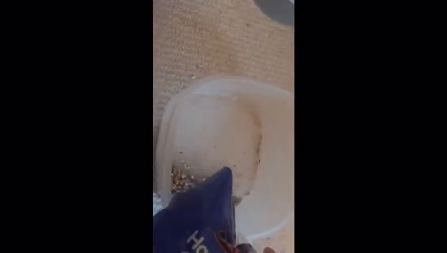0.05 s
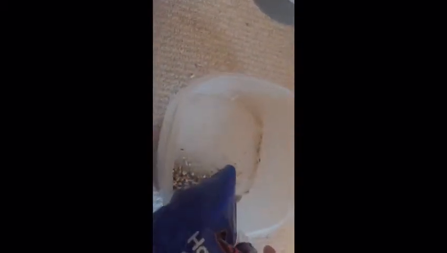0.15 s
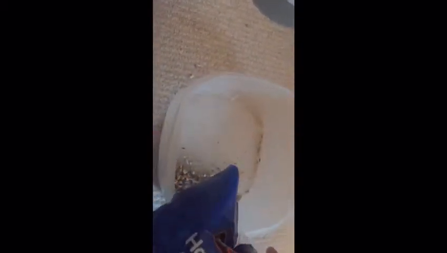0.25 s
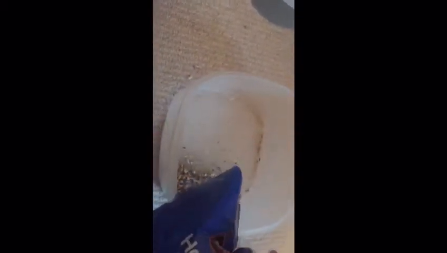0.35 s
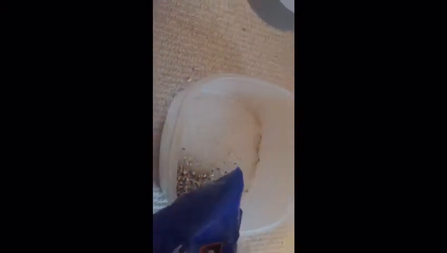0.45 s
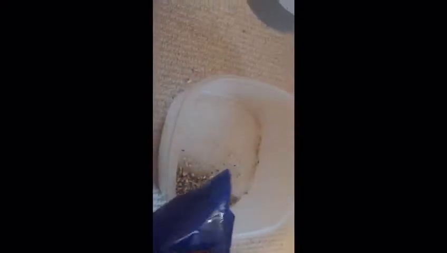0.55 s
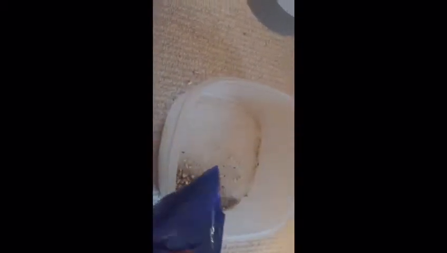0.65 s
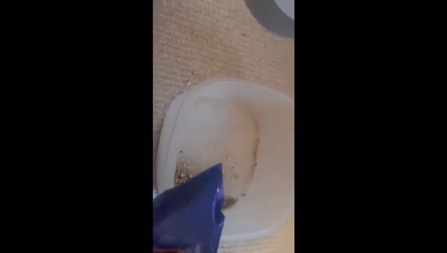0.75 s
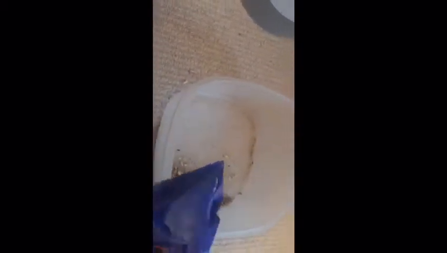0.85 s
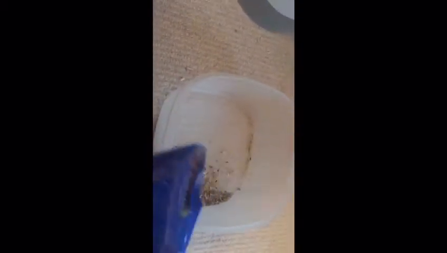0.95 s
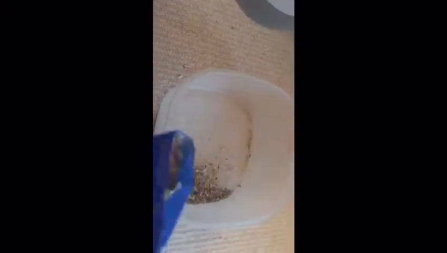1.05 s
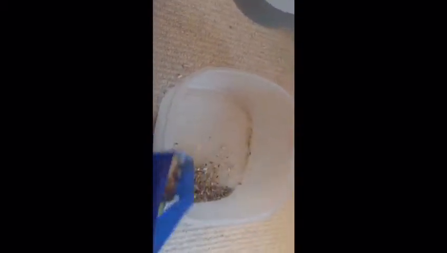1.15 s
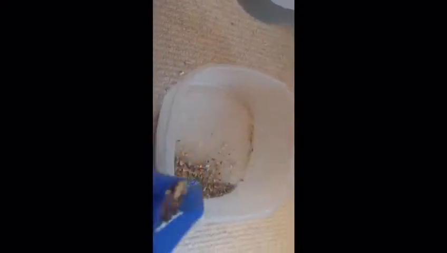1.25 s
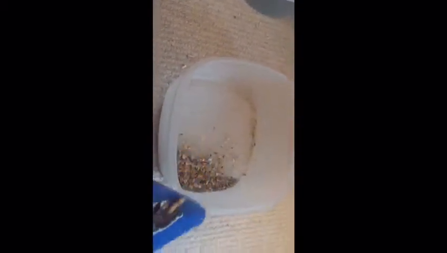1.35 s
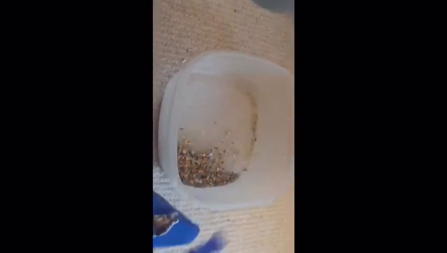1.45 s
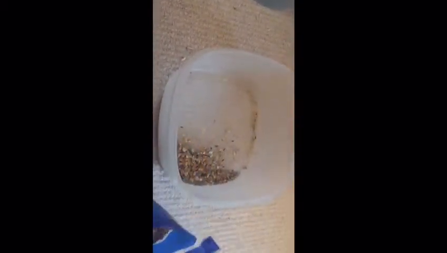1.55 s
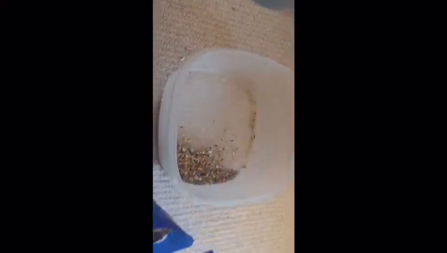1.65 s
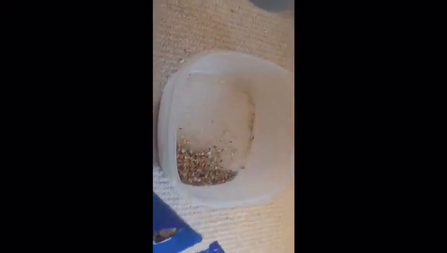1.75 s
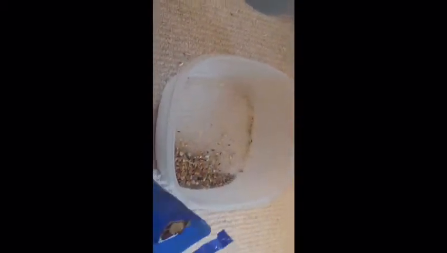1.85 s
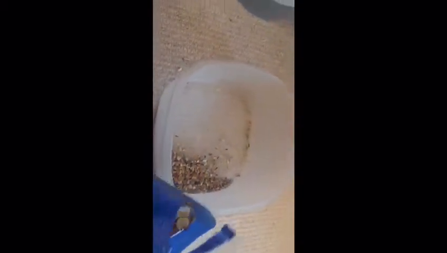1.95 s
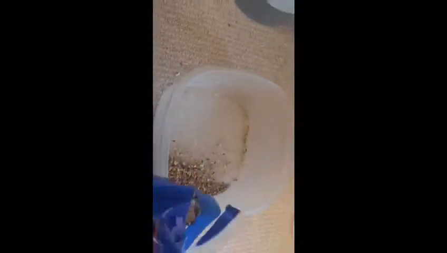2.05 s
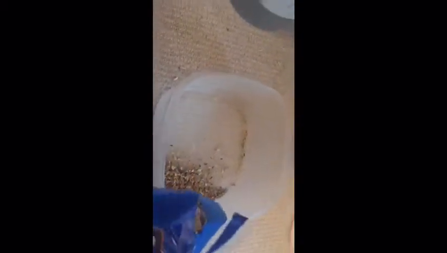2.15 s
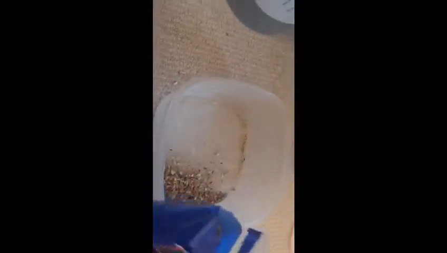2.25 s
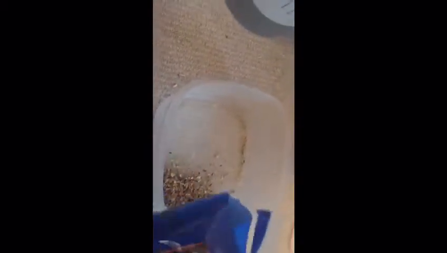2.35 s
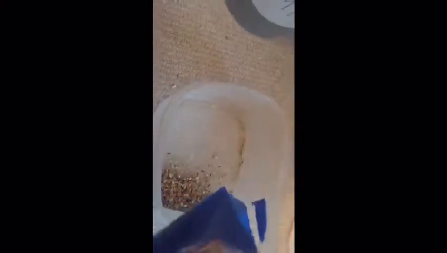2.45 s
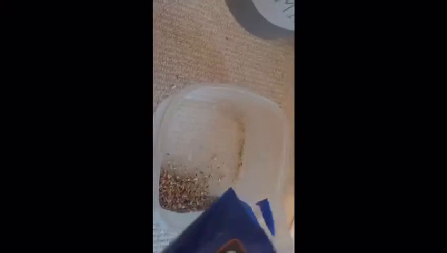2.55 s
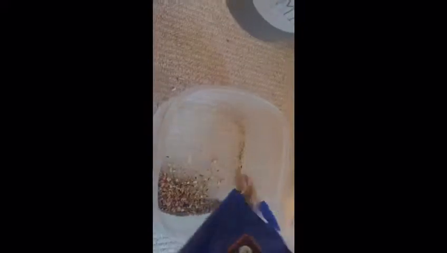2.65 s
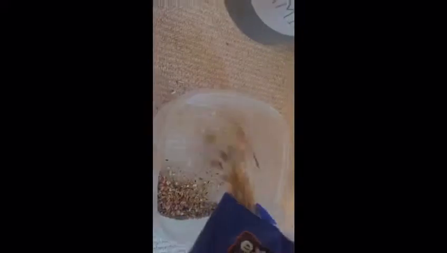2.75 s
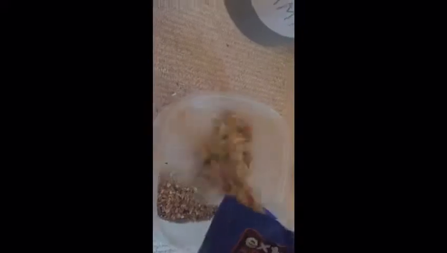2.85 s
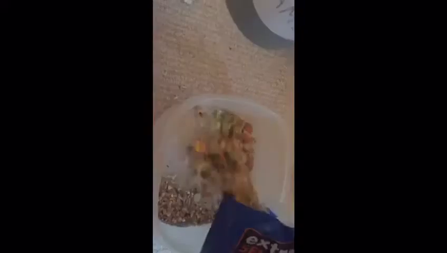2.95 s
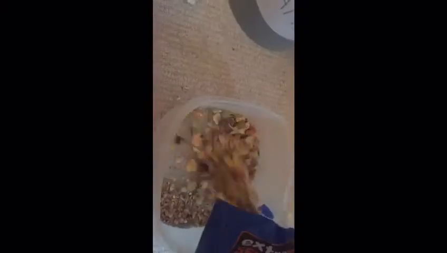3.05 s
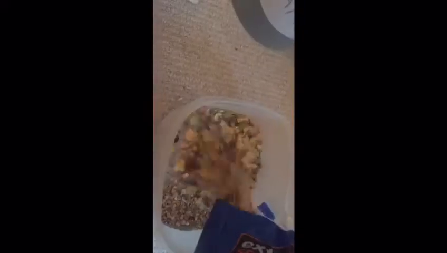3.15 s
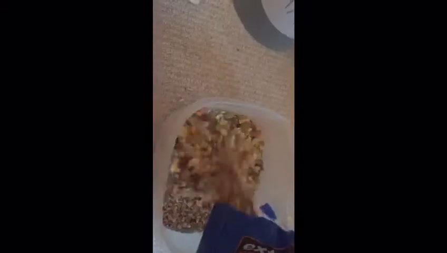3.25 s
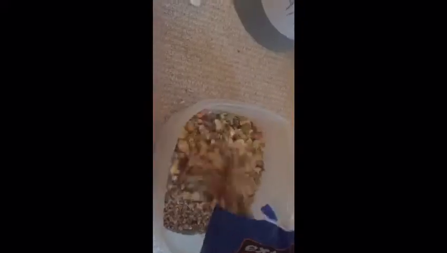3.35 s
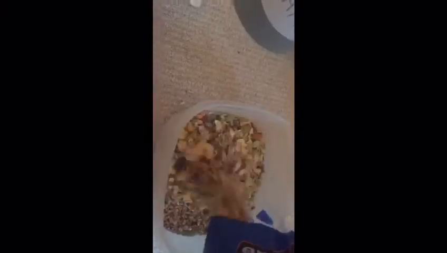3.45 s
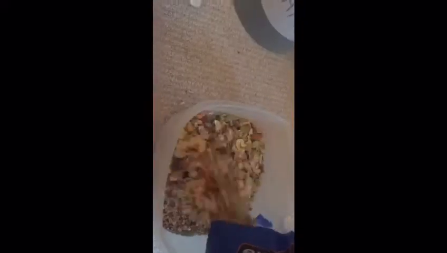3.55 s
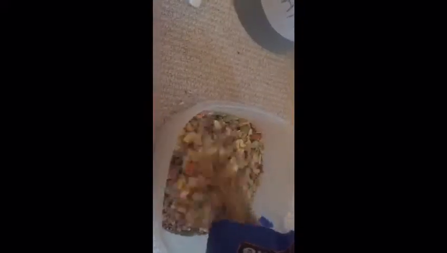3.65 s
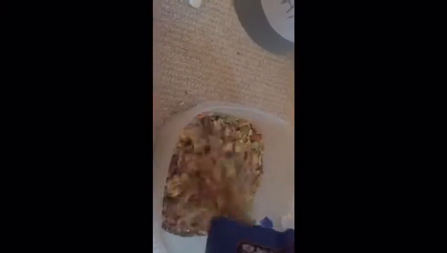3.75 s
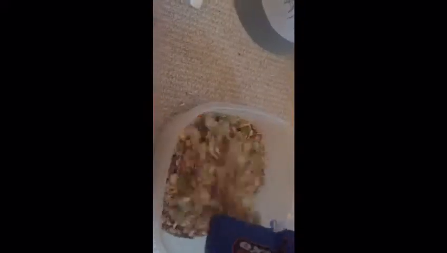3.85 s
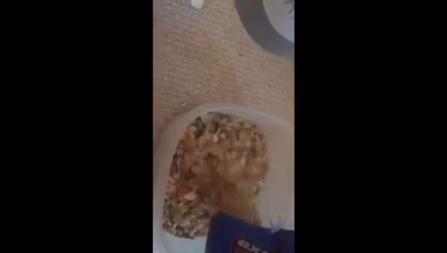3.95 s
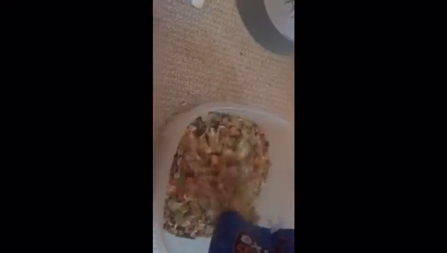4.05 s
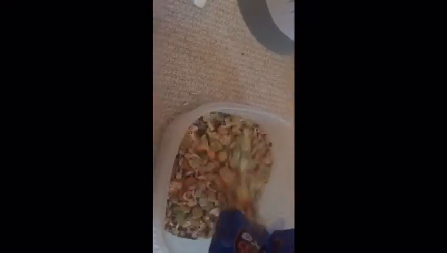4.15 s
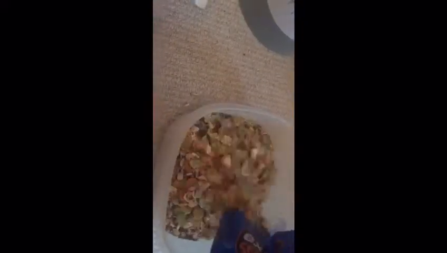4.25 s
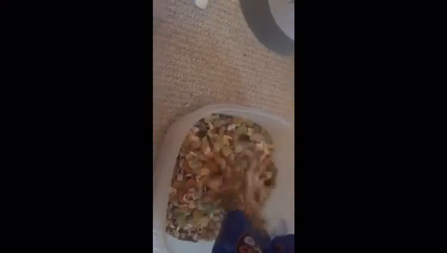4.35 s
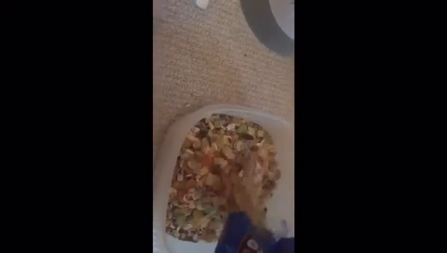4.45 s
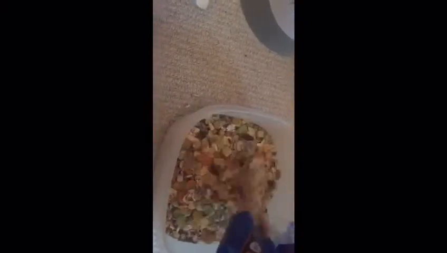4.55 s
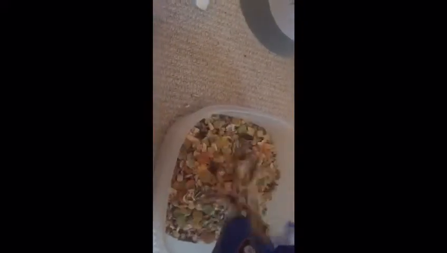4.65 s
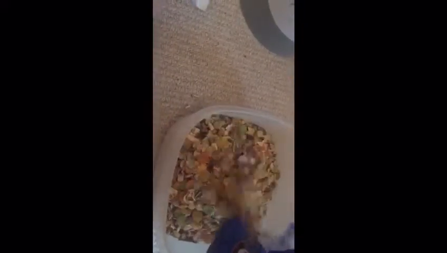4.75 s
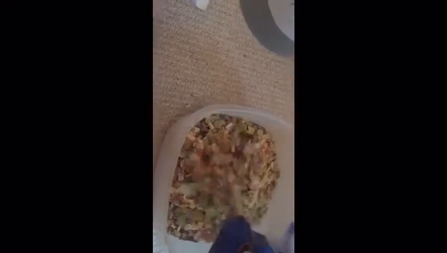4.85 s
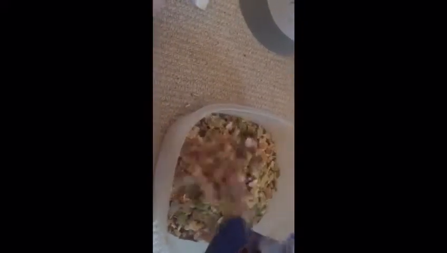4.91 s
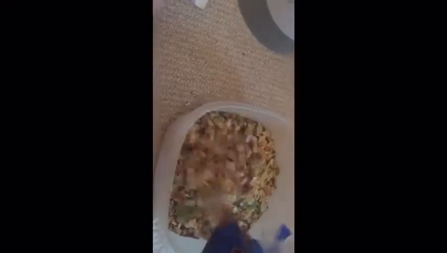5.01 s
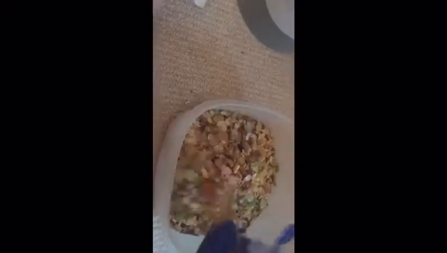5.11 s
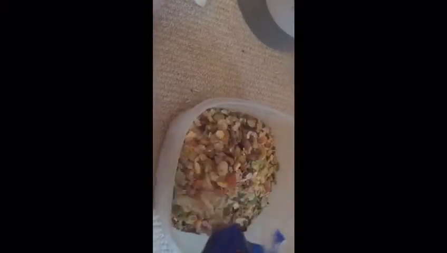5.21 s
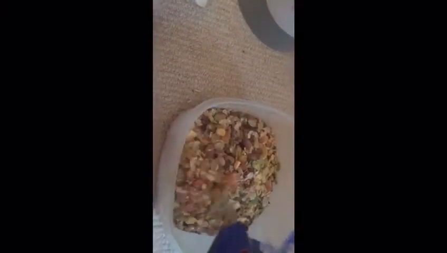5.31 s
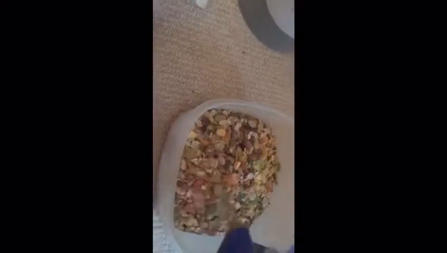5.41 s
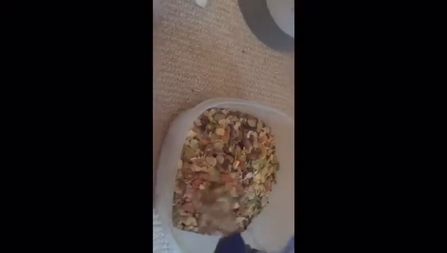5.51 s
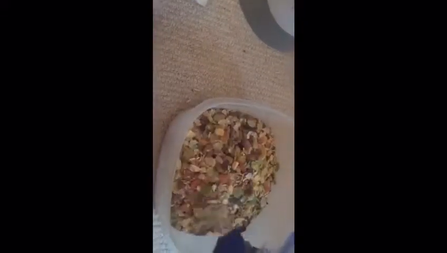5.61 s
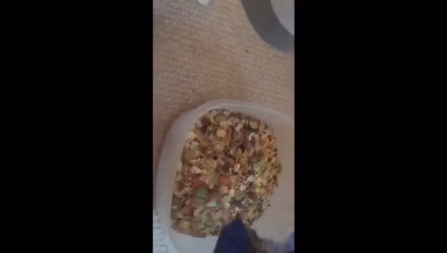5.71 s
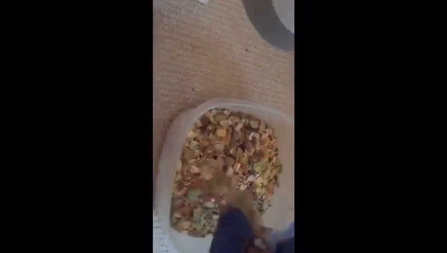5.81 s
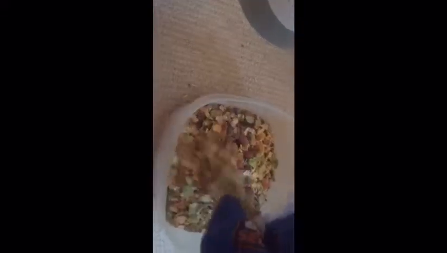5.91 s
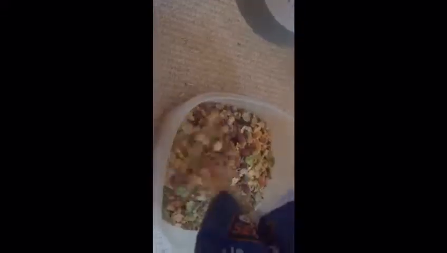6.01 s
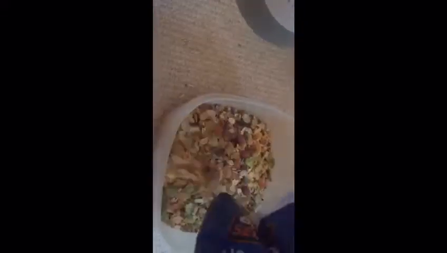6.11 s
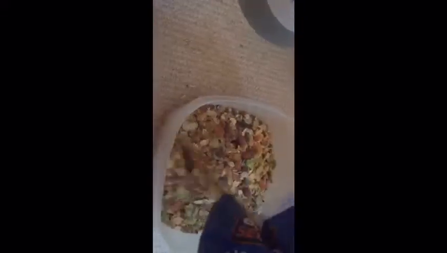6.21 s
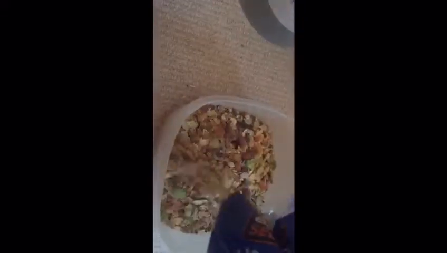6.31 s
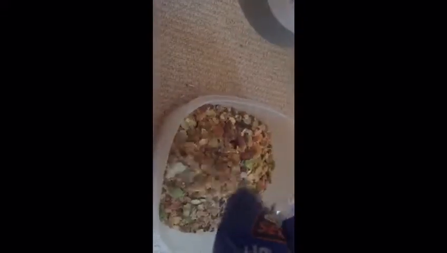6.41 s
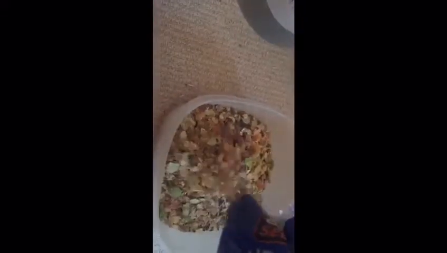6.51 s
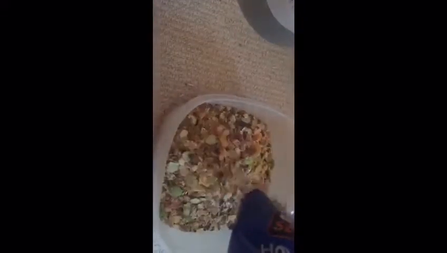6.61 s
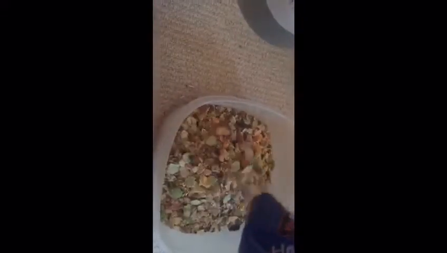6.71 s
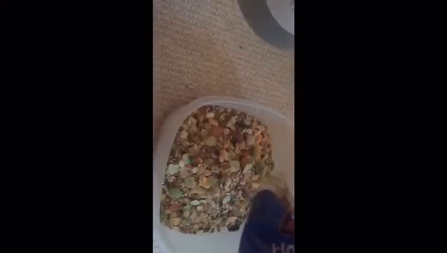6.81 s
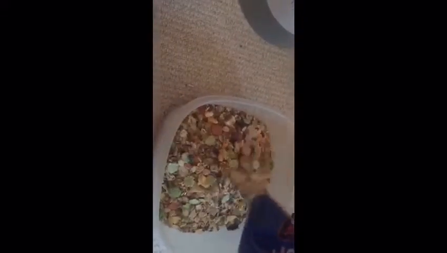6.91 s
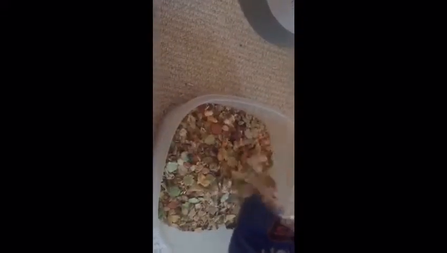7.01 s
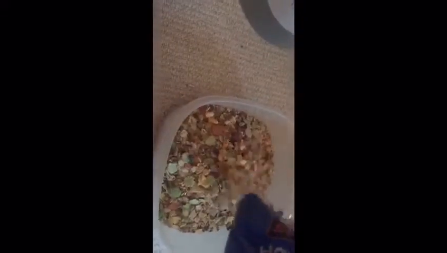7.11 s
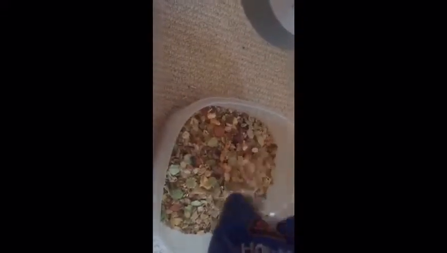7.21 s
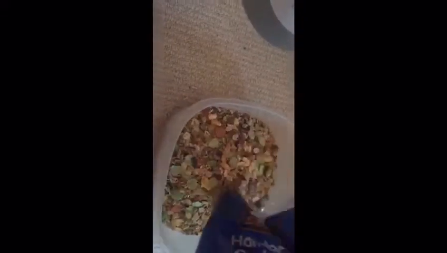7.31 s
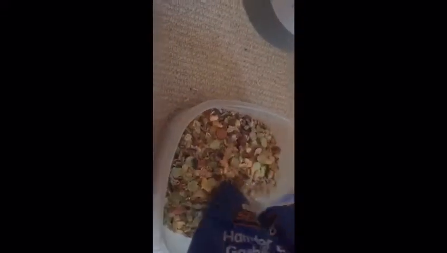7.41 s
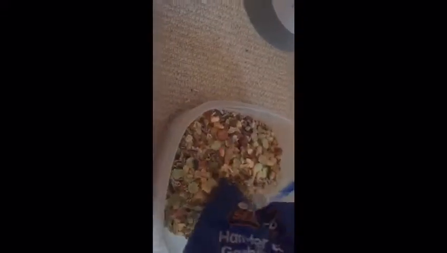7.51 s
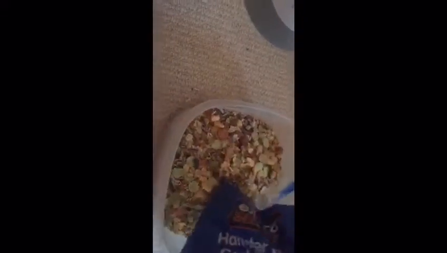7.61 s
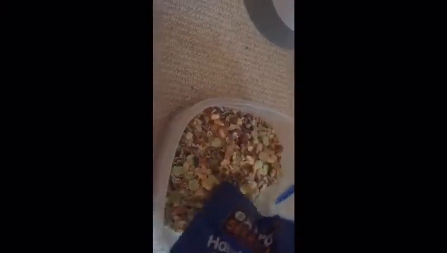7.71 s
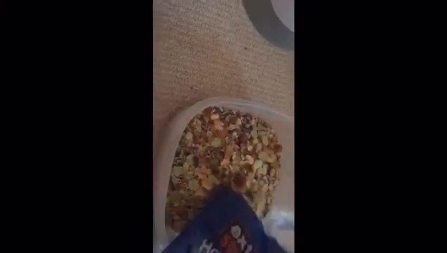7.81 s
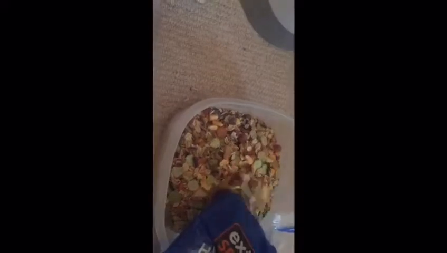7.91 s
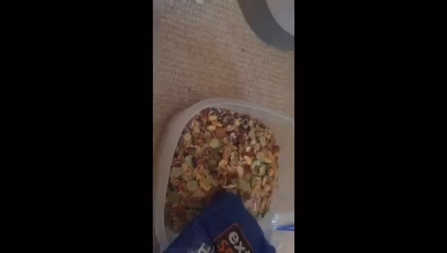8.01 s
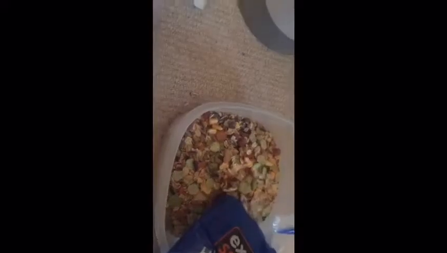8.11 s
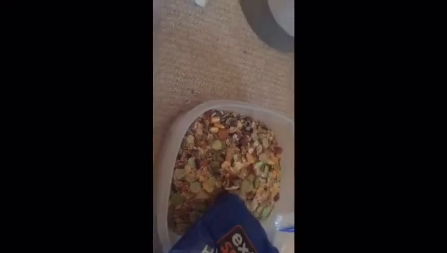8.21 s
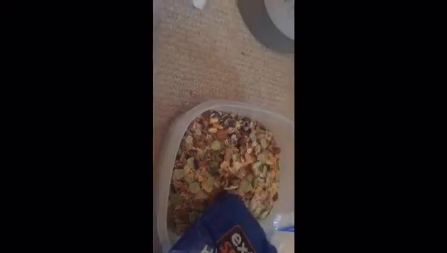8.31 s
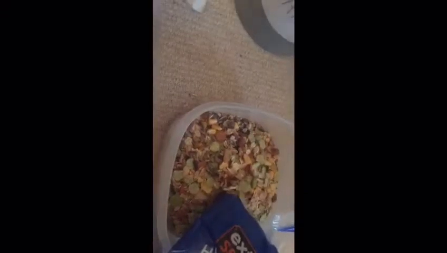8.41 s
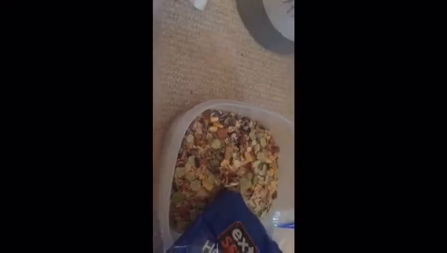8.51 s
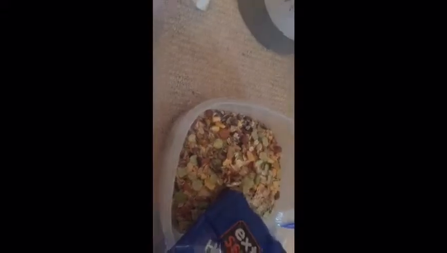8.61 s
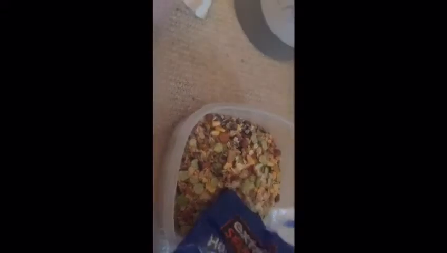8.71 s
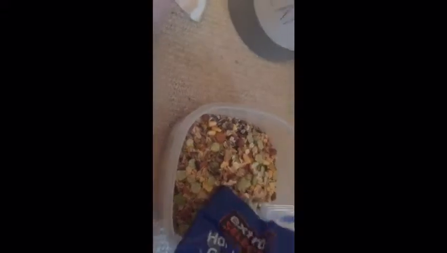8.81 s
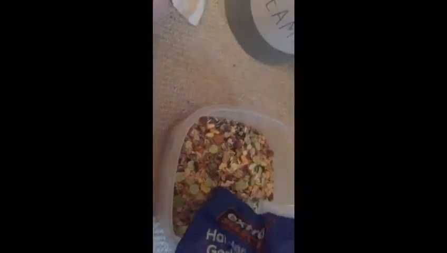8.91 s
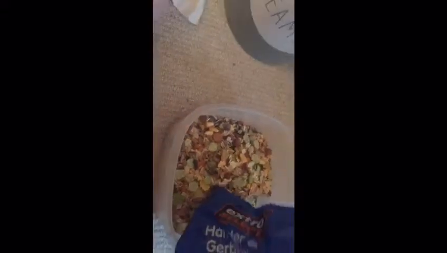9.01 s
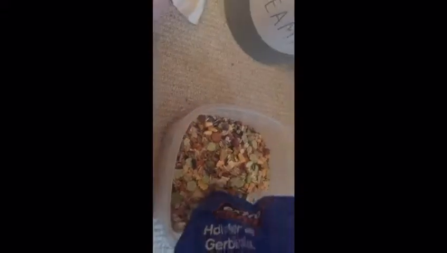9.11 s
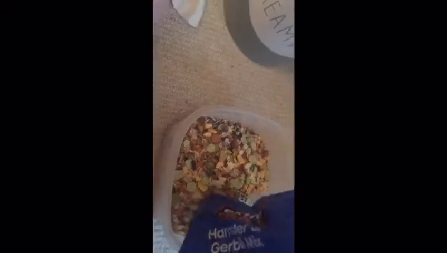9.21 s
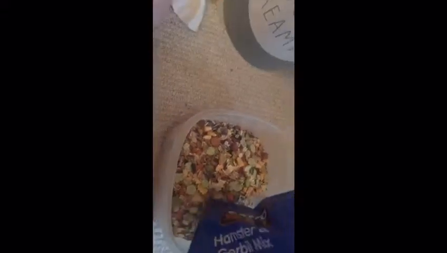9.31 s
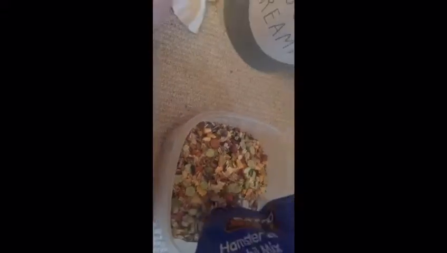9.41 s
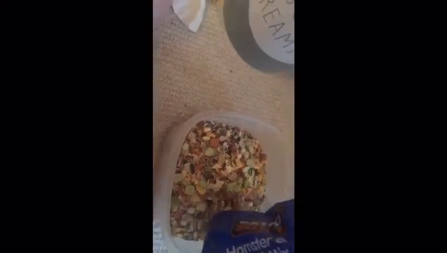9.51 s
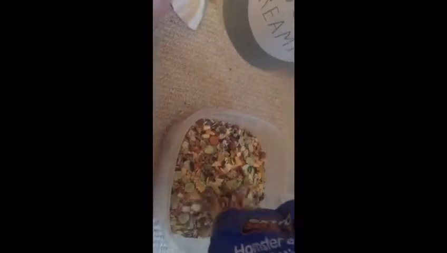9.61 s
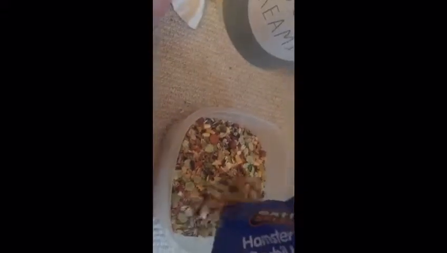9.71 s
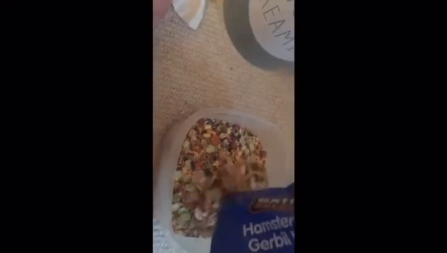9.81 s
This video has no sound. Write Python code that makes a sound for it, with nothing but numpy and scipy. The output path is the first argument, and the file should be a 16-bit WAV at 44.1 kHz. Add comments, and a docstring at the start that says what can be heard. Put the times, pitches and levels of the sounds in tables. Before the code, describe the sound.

A stiff plastic bag crinkles, then dry seed and pellet mix bursts loudly into a plastic tub, softens to patter, pauses and resumes.

```python
"""Dry seed and flake mix is poured from a stiff plastic bag into a plastic tub on a carpeted floor, close by.
The first pellets drum on the bare tub; the growing heap muffles it and the stream becomes a fine patter.
The bag crinkles as it is opened and tipped, then is gripped anew and the pouring starts again.
Stream and crinkle are showers of tiny random contacts; clacks, ticks, knocks and thumps are short bursts
of noise and dying tones. A small room and a faint hush of air lie behind them."""
import sys
import numpy as np
from scipy import signal
from scipy.fft import rfft, irfft, next_fast_len
from scipy.io import wavfile
from scipy.ndimage import uniform_filter1d

SR = 44100
rng = np.random.default_rng(int(sys.argv[2]) if len(sys.argv) > 2 else 0)


def to_wav(s):
    """Save 16-bit WAV."""
    ch = np.atleast_2d(s).T  # columns
    pcm = np.round(np.clip(ch, -1, 1) * 32767)  # PCM
    wavfile.write(sys.argv[1], SR, pcm.astype(np.int16))


N = 434826
AGE = np.arange(SR // 8) / SR   # time since a contact (s)
ATTACK = int(.004 * SR)   # the first 4 ms of a contact, in samples

# the first seeds slide over the lip, softer until they land
POUR_START_S, POUR_RISE_S, LIP_SEEDS_DB = 2.62, 0.036, -6
# the bulk lands on the bare tub at once and is muffled as the heap grows
LANDING_S, LANDING_RISE_S, MUFFLING_S = 2.82, 0.037, 0.47
BARE_PELLETS_DB, BARE_SEEDS_DB, BARE_THUD_DB = 16, 10, 12.5   # most extra level on the bare tub
HEAP_THUD_DB = -9   # dull thudding of the heap, relative to the pellets

# basic levels of the stream, before its surges and extras: (time_s, pellets_db, seeds_and_husks_db)
STREAM_FLOW = [(3.33, -33, -32), (3.849, -32.5, -30.5), (4.02, -29, -29.5), (4.35, -33, -35.5),
               (4.681, -34, -36), (4.82, -39, -36), (5.1, -38, -34.5), (5.55, -42, -39.5),
               (5.77, -39.5, -41.5), (5.86, -32, -30.5), (6.05, -32, -31.5), (6.25, -41, -35.5),
               (6.74, -39, -40), (7.05, -37, -34.5), (7.38, -38.5, -40), (7.79, -35.5, -41.5),
               (7.89, -27, -37.5), (8.16, -35.5, -50), (8.25, -47, -69)]
# the same when pouring starts again: (time_s, pellets_db, seeds_and_husks_db)
RESUMED_FLOW = [(9.55, -42, -50.5), (9.778, -37.5, -42), (9.85, -31.5, -32)]
# tone colour of the mix landing on itself: (pitch_hz, level_db per Hz)
MIX_COLOUR = [(30, -33), (128, -1), (290, 2.5), (500, -8), (656, -2.5), (1070, -2.5), (1510, -1.5),
              (2640, -2), (4200, -4.5), (4980, -9), (9630, -6), (12000, -7.5), (15600, -4), (22000, -120)]


def pour(flow, start_s):
    """Seeds rain on the tub with a wandering loudness; its bottom rings until the heap covers it, then only the
    walls do."""
    hits_per_s, covering_s = 1300, 0.25   # hits when the pellets are at -35 dB
    bottom_db, walls_db, trim_db = -7, -24, -1
    t, flow_db = controls(flow, start_s)
    levels = streaming(t, *flow_db)
    per_s = hits_per_s * from_db(.75 * (levels[0] + 35.0))
    patter = grains(per_s, spread_db=2.0, crack_t60=0.0016, ring_db=5.0, ring_t60=0.032, tone_db=-3.0, cycles=23)
    patter = patter * from_db(2.0 * wander(t, per_s=38))
    levels = levels + 1.4 * wander(t, per_s=18)   # the stream never runs quite evenly
    bare = (t > LANDING_S) * np.exp(-np.abs(t - LANDING_S) / covering_s)
    heap = coloured(patter, MIX_COLOUR)
    tub = signal.oaconvolve(patter, tub_ring())[:len(t)]
    without_depth = band(heap, 340, SR, order=1)
    heap = heap + np.sqrt(bare) * (without_depth - heap)   # the deepest thuds need a heap
    tub_level = from_db(bottom_db) * bare + from_db(walls_db)
    landing = heap / rms(heap) + tub_level * tub / rms(tub)
    return from_db(trim_db) * by_size(landing, levels)


# clumps that break loose from the stream: (peak_s, above_flow_db, dying_s)
SPURTS_OF_MIX = [(3.07, 1.5, 0.089), (3.24, 1.5, 0.029), (4.51, 2.5, 0.022), (4.667, 4, 0.018),
                 (4.73, 5, 0.013), (4.966, 4.5, 0.023), (6.465, 4.5, 0.043), (6.655, 5.5, 0.049),
                 (6.862, 4.5, 0.025), (7.036, 2.5, 0.044), (7.22, 1.5, 0.023), (7.5, 6, 0.051)]


def streaming(t, pellets_db, seeds_db):
    """Levels of pellets, small seeds and thudding: the flow sets in, spurts, and is loudest on the bare tub."""
    onset_db = -10 * np.maximum(1 - (t - POUR_START_S) / POUR_RISE_S, 0)
    spurts_db = 0
    for peak_s, db, dying_s in SPURTS_OF_MIX:
        distance = away(t, peak_s, 0.75 * dying_s, dying_s)   # a clump swells faster than it dies
        spurts_db = spurts_db + db * np.exp(-np.minimum(distance ** 2, 20))
    bare = np.maximum(1 - away(t, LANDING_S + LANDING_RISE_S, LANDING_RISE_S, MUFFLING_S), 0)
    sliding = t < LANDING_S
    levels = (pellets_db + BARE_PELLETS_DB * bare,
              seeds_db + BARE_SEEDS_DB * bare + LIP_SEEDS_DB * sliding,
              pellets_db + BARE_THUD_DB * bare + HEAP_THUD_DB)
    return [db + onset_db + spurts_db for db in levels]


# hard pellets that clack out of the stream: (start_s, level_db over the first 4 ms, pitch_hz at the centre)
CLACKING_PELLETS = [(2.789, -24, 3210), (2.862, -7, 3680), (4.339, -21.5, 2620), (5.001, -20.5, 2200),
                    (5.209, -25, 4500), (5.313, -26.5, 2610), (5.652, -22.5, 3330), (6.107, -29, 1300),
                    (6.254, -31, 2700), (6.388, -29.5, 1490), (6.542, -28, 4920), (6.594, -23, 1470),
                    (6.657, -21, 2540), (6.769, -30, 1520), (7.003, -21.5, 1240), (7.051, -25.5, 3500),
                    (7.461, -24, 2380), (7.484, -24.5, 5340), (7.546, -23, 2200)]


def pellets(rows):
    """Hard pellets land on the heap and rebound off their neighbours with a short, full clack."""
    return snaps(rows, body_db=-15, again_cycles=6.0, again_db=-8.5)


def strays(per_s, level_db, low_hz, high_hz):
    """Rows (start_s, level_db, pitch_hz) of lone pellets that land at random while the mix streams."""
    end_s = 7.8   # the bag is raised and the rest slides back inside it
    follows, spread_db = 0.54, 2.5   # share of the flow's swing that they follow; scatter of their strength
    s, flow_db, _ = np.transpose(STREAM_FLOW)
    wait, size, pitch = rng.random((200, 3)).T
    times = s[0] + np.cumsum(-np.log(1 - wait)) / per_s
    mean_db = flow_db.mean()
    db = mean_db + follows * (np.interp(times, s, flow_db) - mean_db)
    db = db + level_db + spread_db * np.minimum(-np.log(1 - size), 3)
    pitch_hz = low_hz * (high_hz / low_hz) ** pitch
    return np.transpose([times, db, pitch_hz])[times < end_s]


# blows on the bare tub: (start_s, level_db over the first 4 ms)
TUB_BLOWS = [(0.306, -23), (0.315, -33.5), (2.806, -6.5), (2.815, -11), (2.841, -4), (2.849, -5.5),
             (2.872, -11), (2.879, -15), (2.892, -10), (2.917, -12.5), (2.927, -11.5), (2.938, -11),
             (3.003, -13.5)]


def knocks():
    """Hard pieces hit the bare tub: a crack and the ring of the plastic."""
    crack_db = 2.0   # relative to the ring
    out = np.zeros(N)
    for s, db in TUB_BLOWS:
        crack = band(tick(crack_t60=0.015, ring_db=-15.0, ring_t60=0.028), 1200, 3800, order=1)
        ring = tub_ring(scatter_db=3.5, detune=0.018)
        sound = from_db(crack_db) * crack / rms(crack[:ATTACK]) + ring / rms(ring[:ATTACK])
        add(out, s, from_db(db) * sound / rms(sound[:ATTACK]))
    return out


# tones in which the tub rings: (pitch_hz, level_db, t60_s: time to die by 60 dB)
TUB_TONES = [(410, -6, 0.081), (640, -1.5, 0.02), (1020, -1.5, 0.03), (1230, 2.5, 0.02), (1340, 6.5, 0.038),
             (2100, 5, 0.019), (3390, 5, 0.015), (4500, -2, 0.015)]


def tub_ring(scatter_db=0, detune=0):
    """A blow sets off dying tones in the tub; their strength and pitch can vary at random from blow to blow."""
    ring = np.zeros(len(AGE))
    for k, (hz, db, t60) in enumerate(TUB_TONES):
        level = from_db(db + scatter_db * rng.standard_normal())
        pitch_hz = hz * (1 + detune * rng.standard_normal())
        ring += level * (-1) ** k * fade(t60) * np.sin(2 * np.pi * pitch_hz * AGE)
    return ring


# dull thumps, as a panel of the bag flips or a big pellet lands: (start_s, strength_db, pitch_hz)
DULL_THUMPS = [(0.602, -21.5, 373), (0.653, -31.5, 226), (1.127, -27, 150), (1.318, -23.5, 192),
               (1.61, -21, 150), (1.68, -23, 141), (2.086, -21, 121), (3.002, -14.5, 338),
               (3.202, -17.5, 273), (3.268, -13.5, 405), (3.541, -7.5, 960), (4.294, -6.5, 1210),
               (4.672, -28, 264), (5.335, -22.5, 281), (6.592, -20, 272), (6.654, -19.5, 289),
               (6.766, -24.5, 236), (8.193, -22, 246), (9.126, -23, 208)]


def thumps(rows):
    """A soft, heavy push swells within one swing and dies in a few more, with a dull puff around its pitch."""
    out = np.zeros(N)
    for s, db, hz in rows:
        puff = band(rng.standard_normal(len(AGE)), hz / 2, hz * 2)
        swing = np.sin(2 * np.pi * hz * AGE) * fade(8 / hz)
        swing = swing + from_db(-6) * puff / rms(puff) * fade(12 / hz)
        swell = 1 - np.exp(-2 * hz * AGE)
        add(out, s, from_db(db) * band(swing * swell, hz / 3, hz * 8))
    return out


# faint rustle of the bag, merely held and turned, before and as it tips: (time_s, level_db)
OPENING_RUSTLE = [(0.0, -50), (0.23, -63), (0.45, -51), (0.7, -51.5), (1.0, -48.5), (1.9, -43), (2.66, -46)]
# the same as the bag is raised and gripped anew: (time_s, level_db)
RIGHTING_RUSTLE = [(7.45, -41.5), (8.28, -71), (8.62, -86), (8.8, -41), (9.3, -45), (9.58, -42.5)]
# tone colour of the plastic film: (pitch_hz, level_db per Hz)
FILM_COLOUR = [(26, -33), (119, -1), (198, 0), (279, 4.5), (595, -8.5), (970, -0.5), (2220, 2), (4980, -14),
               (8950, -20), (11800, -23.5), (22000, -120)]


def bag(held, creases_per_s, spread_db, wander_db):
    """Tiny creases give way at random, the more of them the harder the film is bent; their loudness wanders."""
    trim_db = -0.53
    t, (held_db,) = controls(held, held[0][0])
    levels = bending(t, held_db)
    per_s = creases_per_s * from_db(.25 * (levels[0] + 37.0))   # creases_per_s holds at a rustle of -37 dB
    crinkle = grains(per_s, spread_db, crack_t60=0.0012, ring_db=-0.5, ring_t60=0.043, tone_db=-3.5, cycles=18.0)
    crinkle = crinkle * from_db(wander_db * wander(t, per_s=73))
    return from_db(trim_db) * by_size(coloured(crinkle, FILM_COLOUR), levels)


# the hand bends the bag: (peak_s, rustle_db, dying_s: time to fall by 10 dB,
# crackle_db and flapping_db, both relative to the rustle)
BAG_BENDS = [(0.145, -52.5, 0.023, 1, -18), (0.405, -37, 0.032, -21, -20), (0.872, -32, 0.1, -9.5, -16),
             (1.055, -35.5, 0.13, -7.5, -2.5), (1.14, -38.5, 0.14, -4.5, -5),
             (1.33, -39.5, 0.072, -4, -0.5), (1.438, -31.5, 0.029, -2.5, -2.5),
             (1.602, -32, 0.089, -3.5, -4.5), (1.677, -28.5, 0.019, -9, -4.5), (1.82, -46.5, 0.08, 3.5, -1),
             (2.078, -32, 0.061, -2.5, -5), (2.425, -32, 0.053, -10.5, -16),
             (2.507, -34.5, 0.046, -3.5, -9), (7.67, -40, 0.12, -9, 0.5), (8.325, -46, 0.017, -15, -8),
             (8.408, -44, 0.054, -9.5, 1.5), (8.671, -39.5, 0.023, -27.5, -7.5),
             (8.816, -30, 0.086, -8, -3), (9.145, -43.5, 0.051, -2, 1), (9.254, -34.5, 0.045, -1.5, -10),
             (9.413, -37, 0.083, -4.5, -6)]


def bending(t, held_db):
    """Levels of rustle, fine crackle and flapping: each bend swells and dies on top of the held bag's rustle."""
    held_crackle_db, held_flap_db = -5, -8   # relative to the held bag's rustle
    rounding = 1.4   # 1 = a pointed swell, 2 = a bell
    power = from_db([[0], [held_crackle_db], [held_flap_db]]) ** 2 * from_db(held_db) ** 2
    for peak_s, db, dying_s, crackle_db, flap_db in BAG_BENDS:
        distance = away(t, peak_s, 0.92 * dying_s, dying_s)
        bend = from_db(db - 10 * np.minimum(distance ** rounding, 10))
        power = power + from_db([[0], [crackle_db], [flap_db]]) ** 2 * bend ** 2
    return 10 * np.log10(power)


# single sharp ticks of buckling creases: (start_s, level_db over the first 4 ms, pitch_hz at the centre)
CREASE_TICKS = [(0.061, -40, 4130), (0.3695, -32.5, 4370), (0.392, -27, 3800), (0.419, -33, 2500),
                (0.435, -32, 3000), (0.456, -28.5, 3340), (0.604, -29.5, 2900), (0.676, -33.5, 2880),
                (0.746, -33.5, 1690), (0.802, -25, 2620), (0.881, -25, 4650), (0.899, -14.5, 5800),
                (0.97, -32, 2100), (1.025, -24, 2090), (1.046, -23, 2630), (1.121, -15, 3960),
                (1.17, -25, 3600), (1.276, -21, 3630), (1.306, -30.5, 2500), (1.334, -28.5, 3280),
                (1.365, -30, 3900), (1.443, -22.5, 3750), (1.498, -28.5, 3750), (1.553, -19.5, 5070),
                (1.575, -23, 2500), (1.588, -19.5, 3100), (1.605, -14.5, 2430), (1.627, -20.5, 2290),
                (1.653, -22.5, 3500), (1.677, -16.5, 4840), (1.787, -20.5, 4260), (1.792, -30, 3600),
                (1.822, -25, 5000), (1.976, -21.5, 6150), (2.038, -24, 2670), (2.073, -24.5, 3800),
                (2.093, -18.5, 3330), (2.1615, -22, 3160), (2.234, -22.5, 3340), (2.389, -16, 5200),
                (2.4, -21, 3020), (2.439, -24.5, 1900), (2.486, -17.5, 4500), (2.493, -19.5, 2550),
                (2.566, -22, 4500), (2.661, -27.5, 2530), (2.709, -21.5, 2160), (2.76, -18, 3780),
                (6.276, -20.5, 11000), (7.985, -23, 2040), (8.262, -38.5, 2010), (8.515, -37.5, 1590),
                (8.5425, -31, 1956), (8.677, -33, 1660), (8.808, -11.5, 2370), (8.819, -18, 7060),
                (8.89, -20, 3130), (8.931, -26.5, 1310), (9.074, -18.5, 2230), (9.103, -27, 1880),
                (9.135, -14.5, 2400), (9.156, -27, 2680), (9.25, -26.5, 3330), (9.423, -24.5, 2960)]


def snaps(rows, body_db=-19, again_cycles=4.0, again_db=-13):
    """A crease or pellet cracks, then catches twice more; low cracks last longer, faint ones are duller."""
    soft_db = -35.5   # a tick this faint reaches an octave above its centre
    width, tone_db = 1.53, -2   # core reaches this factor below and above its centre; tone relative to noise
    out = np.zeros(N)
    for s, db, hz in rows:
        crack = tick(crack_t60=16 / hz, ring_db=-8, ring_t60=60 / hz)
        crack[0] += 1   # the sudden jump of the surface
        crack = band(crack, hz / 20, hz * (1 + from_db(db - soft_db)))
        core = band(crack, hz / width, hz * width, order=1)
        sound = core + from_db(body_db) * band(crack, hz / 8, 1.5 * hz)
        tone = np.sin(2 * np.pi * hz * AGE) * fade(8 / hz)
        sound = sound / rms(sound) + from_db(tone_db) * tone / rms(tone)
        sound = repeated(sound, again_cycles / hz, again_db)
        add(out, s, from_db(db) * sound / rms(sound[:ATTACK]))
    return out


def room(x):
    """A small carpeted room returns a short, dull tail."""
    t60_s, low_hz, high_hz = 0.092, 270, 11200
    t = np.arange(SR // 2) / SR
    noise = rng.standard_normal(len(t)) * from_db(-60 * t / t60_s) * (t > .004)   # starts 4 ms late
    tail = band(noise, low_hz, high_hz, order=1)
    return signal.oaconvolve(x, tail / np.linalg.norm(tail))[:N]


# tone colour of the quiet air: (pitch_hz, level_db per Hz)
AIR_COLOUR = [(30, -26), (120, -5), (500, -5), (2500, -4), (12000, -21)]


def quiet_air():
    """Steady noise, coloured as a faint hush, at an average level of 1."""
    air = coloured(rng.standard_normal(N), AIR_COLOUR)
    return air / rms(air)


def tick(crack_t60, ring_db, ring_t60):
    """One small contact: a crack, then a brief ring of many close tones, both made from dying noise."""
    return rng.standard_normal(len(AGE)) * (fade(crack_t60) + from_db(ring_db) * fade(ring_t60))


def repeated(sound, gap_s, loss_db):
    """A contact followed by two weaker ones after uneven gaps, which give it a colour of its own."""
    lags = (np.cumsum(gap_s * (.5 + rng.random(2))) * SR).astype(int)
    out = sound
    for k, lag in enumerate(lags, 1):
        out = out + from_db(k * loss_db) * np.pad(sound, (lag, 0))[:len(sound)]
    return out


def grains(per_s, spread_db, crack_t60, ring_db, ring_t60, tone_db, cycles, count=160):
    """Random contacts, many faint and few strong, dealt to pieces that each ring briefly at their own pitch."""
    n, short = len(per_s), SR // 50   # each contact lasts 20 ms
    sizes = from_db(spread_db * np.minimum(rng.exponential(1, n), 4.5)) * rng.choice([-1, 1], n)
    born, dealt = rng.random(n) < per_s / SR, rng.integers(0, count, n)
    pieces = []
    for hz in np.linspace(np.sqrt(900), np.sqrt(11000), count) ** 2:
        crack = tick(crack_t60, ring_db, ring_t60)[:short]
        tone = (np.sin(2 * np.pi * hz * AGE) * fade(cycles / hz))[:short]
        pieces.append(crack / rms(crack) + from_db(tone_db) * tone / rms(tone))
    out = np.zeros(n + short)
    for at in np.flatnonzero(born):
        out[at:at + short] += sizes[at] * pieces[dealt[at]]
    return out[:n]


def by_size(patter, levels, low_hz=560, high_hz=4600):
    """Middling, fine and heavy contacts each follow their own level; their ranges overlap and add up to one."""
    size = next_fast_len(len(patter))
    hz, spectrum = np.fft.rfftfreq(size, 1 / SR), rfft(patter, size)
    heavy = 1 / (1 + (hz / low_hz) ** 6)
    fine = 1 - 1 / (1 + (hz / high_hz) ** 4)
    parts = [irfft(spectrum * share, size)[:len(patter)] for share in (1 - heavy - fine, fine, heavy)]
    return sum(evened(part) * from_db(db) for part, db in zip(parts, levels))


def evened(x, size=2200):
    """Holds the level at 1 over some 50 ms and keeps the grain within."""
    return x / np.sqrt(np.abs(uniform_filter1d(x ** 2, size)) + 1e-14)


def wander(t, per_s):
    """A random wander of spread about 1 with per_s turns a second."""
    knots = rng.standard_normal(4000)
    return np.interp((t - t[0]) * per_s, np.arange(len(knots)), knots)


def away(t, peak_s, rise_s, fall_s):
    """Distance from a peak, counted in rise times before it and in fall times after it."""
    return np.maximum((peak_s - t) / rise_s, (t - peak_s) / fall_s)


def controls(curve, start_s):
    """Sample times from start_s to the end of a curve, and its level columns."""
    s, *columns = np.transpose(curve)
    t = np.arange(start_s * SR, s[-1] * SR) / SR
    return t, [np.interp(t, s, c) for c in columns]


def coloured(x, spectrum, size=2048):
    """Minimum-phase filter with the given spectrum: nothing sounds ahead of a click."""
    hz, level_db = np.transpose(spectrum)
    grid = np.maximum(np.fft.rfftfreq(size, 1 / SR), 1)
    grid_db = np.interp(np.log(grid), np.log(hz), level_db)
    cepstrum = irfft(np.log(from_db(grid_db)))
    cepstrum[1:size // 2] *= 2
    cepstrum[size // 2 + 1:] = 0
    return signal.oaconvolve(x, irfft(np.exp(rfft(cepstrum))))[:len(x)]


def band(x, low_hz, high_hz, order=2):
    """Keeps the pitches between two limits."""
    limits = [low_hz, min(high_hz, SR / 2.2)]
    return signal.sosfilt(signal.butter(order, limits, "band", fs=SR, output="sos"), x)


def fade(t60):
    """Dying away by 60 dB in t60 seconds."""
    return from_db(-60 * AGE / t60)


def from_db(db):
    """Decibels to a plain factor."""
    return 10 ** (np.asarray(db) / 20)


def rms(x):
    """Average strength of a sound."""
    return np.sqrt(np.mean(x ** 2) + 1e-20)


def add(out, s, sound):
    """Mixes a sound in at time s."""
    at = max(round(s * SR), 0)
    out[at:at + len(sound)] += sound[:max(N - at, 0)]


def scene():
    """The stream, the tub and the bag in a small, quiet room."""
    room_db, air_db = -14.5, -59.5
    near = pellets(CLACKING_PELLETS) + knocks() + thumps(DULL_THUMPS) + snaps(CREASE_TICKS)
    for flow, start_s in ((STREAM_FLOW, POUR_START_S), (RESUMED_FLOW, RESUMED_FLOW[0][0])):
        add(near, start_s, pour(flow, start_s))
    # lone pellets that stand out of the stream, as ticks and as thumps
    near = near + pellets(strays(per_s=26, level_db=-1.5, low_hz=1040, high_hz=4660))
    near = near + thumps(strays(per_s=10, level_db=2.5, low_hz=185, high_hz=450))
    add(near, OPENING_RUSTLE[0][0], bag(OPENING_RUSTLE, creases_per_s=620, spread_db=3.5, wander_db=2.5))
    # in the tilted bag the mix slides along the film, which makes the rustle denser
    add(near, RIGHTING_RUSTLE[0][0], bag(RIGHTING_RUSTLE, creases_per_s=1400, spread_db=4.0, wander_db=2.0))
    return (near + from_db(room_db) * room(near) + from_db(air_db) * quiet_air())[None]


def record(dry):
    """The strongest peaks are rounded off; the top is cut."""
    cutoff_hz = 11900
    rounded = dry / (1 + (dry / .85) ** 6) ** (1 / 6)
    return signal.sosfilt(signal.ellip(14, .1, 100, cutoff_hz, fs=SR, output="sos"), rounded)


dry = scene()
out = record(dry)
to_wav(out)
```